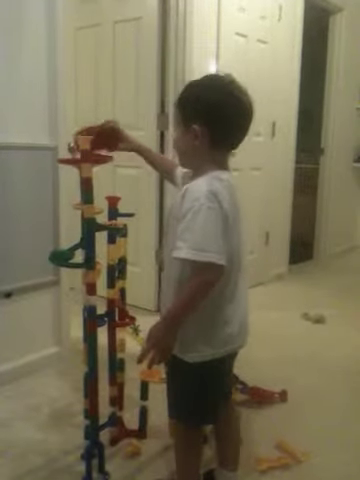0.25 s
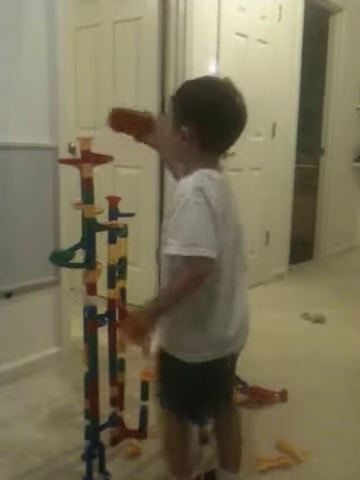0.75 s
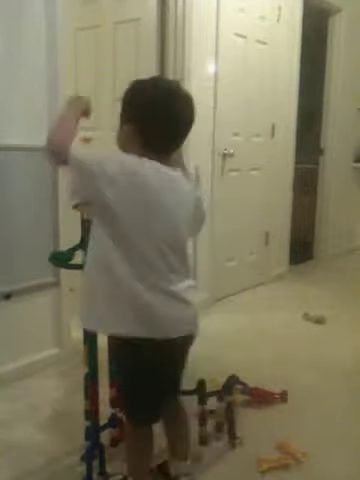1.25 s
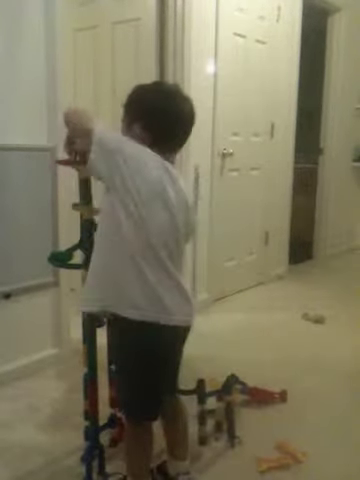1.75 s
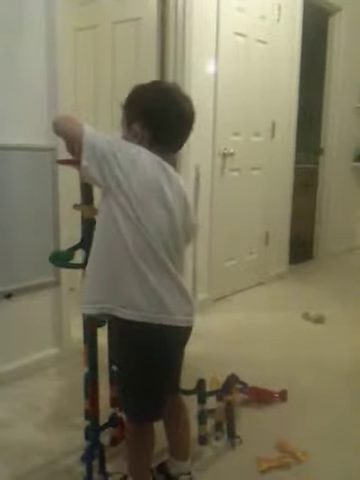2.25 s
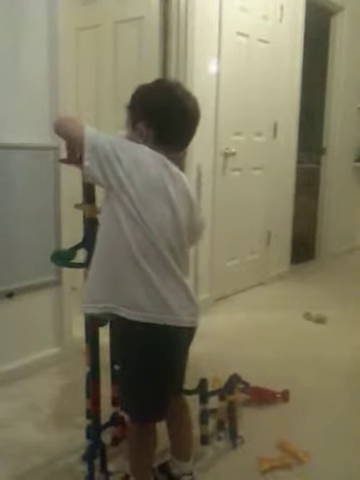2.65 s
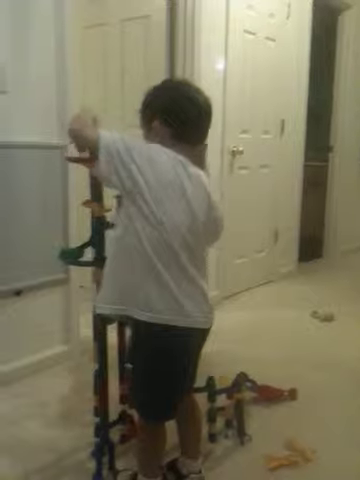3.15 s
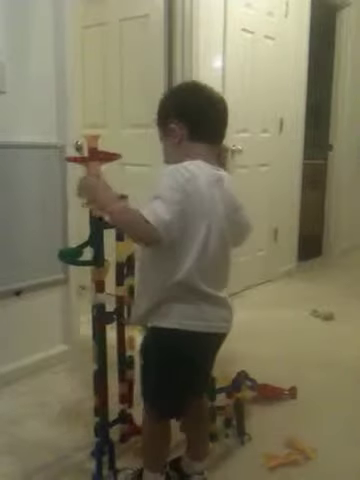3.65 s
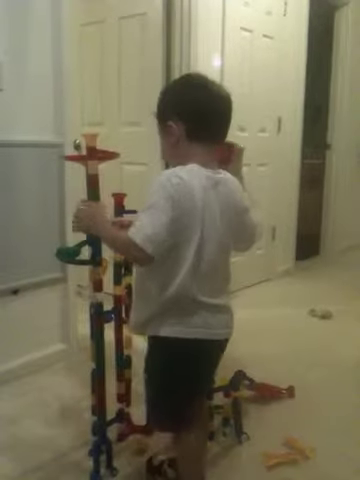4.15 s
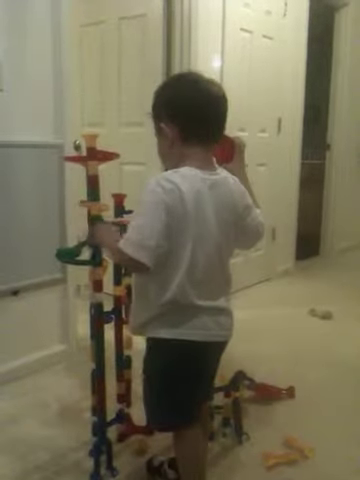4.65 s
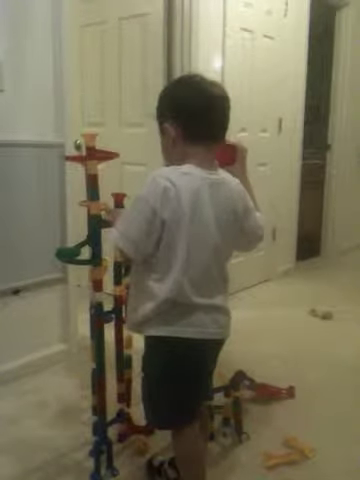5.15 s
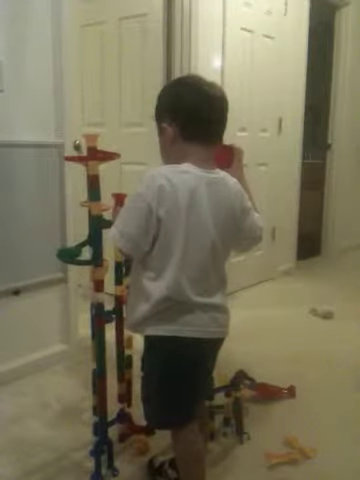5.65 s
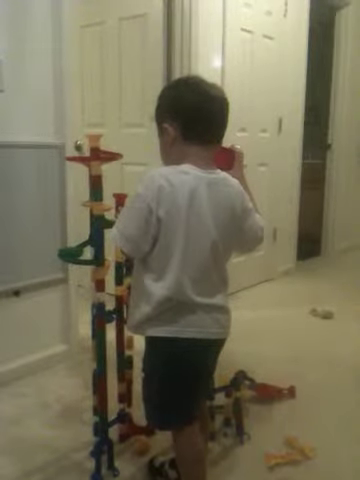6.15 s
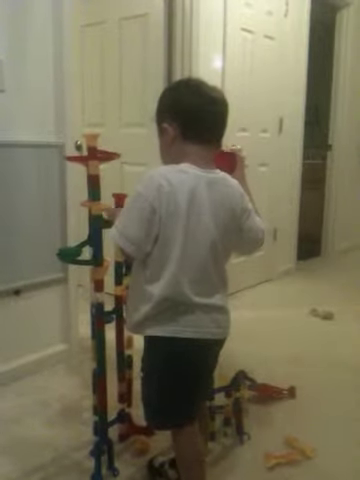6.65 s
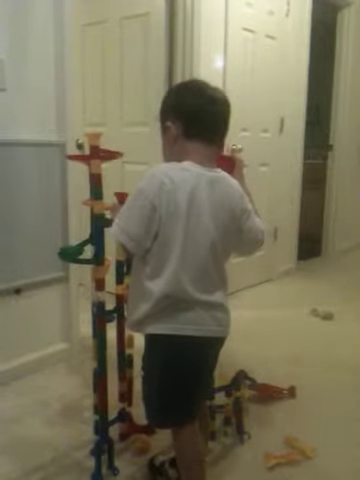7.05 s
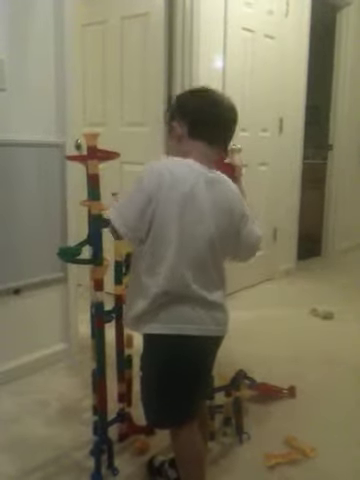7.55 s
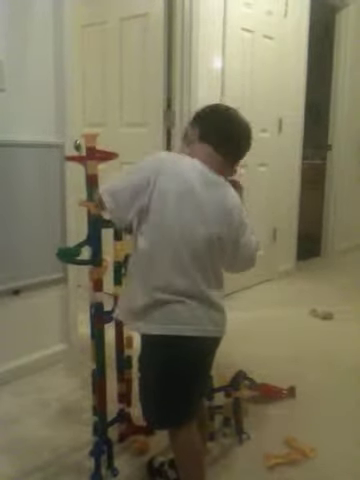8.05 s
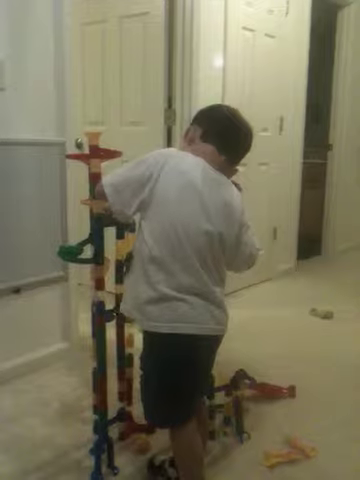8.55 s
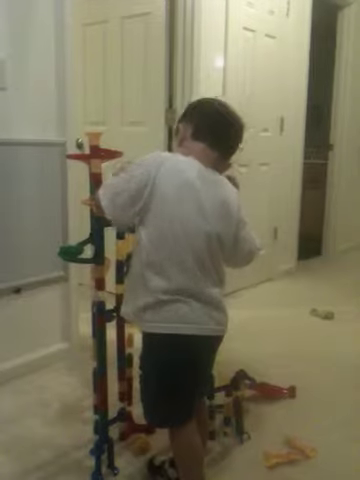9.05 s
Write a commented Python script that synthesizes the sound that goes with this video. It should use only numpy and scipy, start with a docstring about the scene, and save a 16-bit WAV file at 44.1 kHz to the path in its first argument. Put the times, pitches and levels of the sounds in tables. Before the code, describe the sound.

Glass marbles pour through a tall plastic marble run in a bare hallway. Rapid irregular knocks, each a tiny burst of bouncing clicks, overlap with rolling patter and a hollow funnel rattle. It is busiest in the first several seconds, then becomes lighter and sparser towards the end. One fairly close microphone catches short lively reflections over faint house hum and hiss.

```python
"""In a bare hallway, glass marbles are tipped into a tall plastic marble run and clatter down it.
Each knock is a train of quick clicks that rings the track pieces, the hollow funnel and the struck piece.
Rolling marbles are a patter of random small clicks between the knocks, with a humming trough below.
Noise-built hallway responses smear it into a dense rattle; the funnel's neck and the house sound beneath."""
import sys
import numpy as np
from scipy import signal
from scipy.fft import rfft, irfft, next_fast_len
from scipy.io import wavfile

SR = 44100
rng = np.random.default_rng(int(sys.argv[2]) if len(sys.argv) > 2 else 0)


def digitize_waveform(pressure):
    """Quantize a signal to 16-bit integers and store it at the path in sys.argv[1].

    Rows of a 2-D input are taken as channels; values are limited to [-1, 1].
    """
    field = np.atleast_2d(pressure).T
    bounded = np.clip(field, -1, 1)
    quanta = np.round(bounded * 32767).astype(np.int16)
    wavfile.write(sys.argv[1], SR, quanta)


N = 410130  # samples

# knocks of marbles on the run, all levels relative: start_s, peak_db, glassy tick_db, thin edge_db and
# funnel_db re peak, struck piece_hz, its ring piece_db re peak
KNOCKS = [(0.0024, -17.5, -28, -1, -14, 2800, -42), (0.0326, -16.5, -27, 1.5, -21, 1860, -21),
          (0.0799, -13.5, -17, 3.5, -22, 3650, -33), (0.127, -14, -18, 2.5, -15, 2150, -24),
          (0.183, -12.5, -28, -0.5, -16, 2450, -25), (0.2847, -17, -16, 4.5, -14, 1820, -18),
          (0.3044, -18, -24, -1, -15, 1970, -38), (0.374, -39, -6, 6.5, -21, 3590, -19),
          (0.4412, -20, -22, 5.5, -25, 3620, -41), (0.5368, -17, -26, -4, -37, 2170, -29),
          (0.5597, -14.5, -17, -0.5, -16, 2800, -26), (0.5891, -15, -28, 0, -18, 3330, -20),
          (0.6896, -13, -16.5, 3, -31, 2590, -41), (0.7337, -18, -16, 0.5, -15, 2310, -34),
          (0.8321, -13.5, -19, 0.5, -14, 4830, -15), (0.853, -24, -20, -1, -32, 2450, -30),
          (0.913, -15, -16, -1.5, -16, 1940, -34), (0.97, -17, -13, 1.5, -13, 2760, -40),
          (1.0043, -22.5, -8, -9, -12, 2495, -36), (1.0634, -16.5, -21, -3, -21, 1940, -22),
          (1.1047, -21.5, -7.5, -19, -8, 2790, -42), (1.152, -15.5, -19, -2.5, -21, 1990, -27),
          (1.22, -19, -19, -4, -17, 2710, -40), (1.277, -18, -16, 1.5, -19, 1970, -38),
          (1.299, -14.5, -14.5, 0, -15, 1920, -36), (1.388, -13, -17.5, -4, -17.5, 1900, -43),
          (1.4776, -14, -16.5, -0.5, -18.5, 2830, -38), (1.5416, -19.5, -12, 3.5, -12, 2800, -40),
          (1.5846, -17, -11.5, 6.5, -13.5, 4340, -24), (1.6995, -20.5, -13, 1, -17, 2940, -31),
          (1.7321, -19.5, -13, 6.5, -24, 4720, -35), (1.828, -24.5, -6, 8, -31, 4870, -23),
          (1.879, -21.5, -29, 3, -39, 2320, -30), (1.9558, -25.5, -1.5, 2, 0, 1970, -33),
          (2.019, -37, -15, 5, -18, 2380, -32), (2.151, -23, -7, 6, -12, 2500, -38),
          (2.1597, -17.5, -19, 0, -9, 2620, -38), (2.1712, -7, -17, 0.5, -16, 2230, -41),
          (2.2175, -16, -17, 3, -18, 3750, -40), (2.25, -15.5, -17, 5, -21, 2530, -19),
          (2.2845, -28, -4, -10, -2, 2580, -32), (2.41, -17, -12, 4, -17, 2970, -18),
          (2.459, -14, -20, 2.5, -14, 2060, -33), (2.5375, -20.5, -10, 7, -7, 3560, -32),
          (2.5774, -12.5, -19, 1, -16, 2910, -37), (2.6187, -16, -17, 2, -26, 4500, -29),
          (2.6999, -10, -14.5, -2, -17, 4880, -21), (2.77, -16.5, -10.5, 4.5, -9.5, 2360, -30),
          (2.824, -14.5, -24, -2, -24, 2930, -35), (2.8481, -17.5, -13, 4, -11, 2790, -33),
          (2.9091, -17.0, -23, 1, -7, 3360, -37), (3.0002, -19.5, -15, 4, -6, 2810, -39),
          (3.0751, -13.5, -15, 3, -17, 2700, -30), (3.1, -15, -30, -5, -16, 2970, -25),
          (3.1826, -20, -21, 3, -7, 2020, -35), (3.2394, -18, -10, 5, -27, 2550, -43),
          (3.3686, -15, -13, 4.5, -20, 2150, -16), (3.38, -20, -19, 3.5, -16, 5000, -23),
          (3.444, -29.5, -4, 4.5, -18, 2870, -1.5), (3.5115, -18, -9, 5.5, -7.5, 4100, -20),
          (3.607, -27, -23, 1, -2.5, 2950, -22), (3.678, -15, -14, 2, -22, 3800, -36),
          (3.7455, -10, -19, 0.5, -12.5, 3660, -43), (3.823, -14.5, -26, -1, -16, 2010, -35),
          (3.848, -13.5, -24, 1, -13, 3600, -39), (3.8937, -20, -10, 5, -8, 4760, -32),
          (3.9613, -18.5, -11, -1, -10, 2580, -22), (3.9902, -19, -16.5, 5, -15, 5070, -19),
          (4.0205, -16.5, -12, 5, -8, 2600, -36), (4.093, -20.5, -6, 2, -11, 2860, -37),
          (4.1539, -17.5, -11, 6.5, -14, 2170, -34), (4.1787, -16, -16, 5, -9, 2200, -32),
          (4.255, -12, -13, 1, -11, 2020, -39), (4.299, -18, -26, 2.5, -18, 3270, -27),
          (4.352, -27, -17, 4.5, -18, 2640, -37), (4.392, -32, -13, 6, -25, 3640, -29),
          (4.449, -25.5, -8, 2, -18, 2810, -31), (4.507, -14.5, -13, 3.5, -29, 2530, -38),
          (4.5718, -18, -15, 1.5, -23, 2520, -19), (4.6329, -10.5, -13.5, 1, -17.5, 2590, -34),
          (4.689, -30, -11, 1.5, -12, 2590, -26), (4.7718, -21.5, -3.5, 7, -2.5, 2730, -32),
          (4.809, -24, -23, -4, -20, 2150, -23), (4.8801, -20.5, -21, 2.5, -9, 2590, -31),
          (4.9372, -17.5, -21, 4, -12, 4210, -37), (4.993, -20, -15, 1.5, -14, 2800, -29),
          (5.0497, -15, -18, 1, -31, 2590, -18), (5.08, -17, -15, 4, -10, 2600, -24),
          (5.129, -17.5, -13, 2.5, -13, 2590, -33), (5.1906, -16.5, -26, -5, -19, 2600, -21),
          (5.244, -17, -20, -2, -14, 2580, -26), (5.275, -20, -22, -3, -12, 2600, -34),
          (5.3132, -18.5, -13, 2.5, -14, 2550, -31), (5.3547, -14, -16, -0.5, -13, 2480, -24),
          (5.452, -24.5, -12, 7, -17, 2250, -37), (5.5002, -18, -11.5, 5, -6, 5100, -21),
          (5.6397, -21, -11.5, -2, -16, 2330, -38), (5.668, -17.5, -22, 1.5, -18, 2230, -25),
          (5.7559, -17, -18, 2.5, -15, 2220, -23), (5.8376, -14.5, -21, 0.5, -15.5, 3600, -45),
          (5.909, -9, -20, -3.5, -22, 3600, -38), (5.9545, -15, -19, 1.5, -16, 2900, -22),
          (6.0084, -21, -31, -3, -33, 2120, -35), (6.0688, -19, -17, 3, -19, 2140, -22),
          (6.1439, -22, -26, 1, -19, 3030, -25), (6.1852, -20.5, -12.5, 0.5, -16, 3760, -37),
          (6.2901, -21, -30, 0, -16, 2340, -27), (6.31, -24, -30, 0, -9, 2390, -28),
          (6.369, -12, -15, -3, -17, 2580, -30), (6.3794, -17, -26, 0.5, -13.5, 2800, -34),
          (6.422, -14, -16, -2, -13, 2300, -27), (6.44, -21, -19, -10, -12, 2360, -32),
          (6.469, -19, -26, 4, -27, 2620, -22), (6.5176, -14, -30, -1.5, -16, 3320, -24),
          (6.5967, -18.5, -17, 1, -20, 4590, -35), (6.6297, -20.5, -26, 2.5, -27, 2880, -16),
          (6.7224, -17.5, -14, 2.5, -21, 2330, -22), (6.7385, -19, -12, 2, -14, 2330, -28),
          (6.7851, -16.5, -13, 0, -18, 2350, -27), (6.9384, -17, -18, -3.5, -15, 2300, -29),
          (7.0267, -17.5, -9, 3.5, -11, 2440, -32), (7.0915, -19, -21, 3.5, -28, 2360, -36),
          (7.222, -17, -19, 1.5, -12, 3240, -27), (7.2576, -20, -10, 2, -9, 2140, -21),
          (7.4459, -20, -14, -7, -16, 2460, -25), (7.4561, -23, -16, 1.5, -13, 2370, -29),
          (7.5181, -23, -16, 3.5, -16, 2420, -31), (7.592, -30.5, -20, -1, -20, 2790, -34),
          (7.7306, -18, -12, -2, -15, 5200, -21), (7.7742, -22, -10, -2, -11, 2540, -22),
          (7.7878, -23, -7, 5.5, -10, 2480, -33), (7.8714, -18, -16, 3, -23, 2670, -23),
          (7.902, -20.5, -16, 1, -22, 2490, -36), (7.957, -21.5, -17, 2.5, -25, 3200, -29),
          (8.0641, -27, -3.5, 6.5, -10, 3900, -26), (8.124, -21, -18, 5, -27, 3700, -21),
          (8.2, -25, -8.5, 5, -20, 2540, -40), (8.2834, -23.5, -18, 3.5, -20, 2290, -16),
          (8.355, -25, -22, 6, -26, 2340, -13), (8.3748, -21, -9, 2, -9.5, 2420, -18.5),
          (8.4852, -20, -11, 4, -27, 3800, -20), (8.5288, -21.5, -14, 4, -34, 2530, -25),
          (8.592, -23, -10, 8, -32, 4840, -33), (8.6544, -24.5, -7, 6, -29, 2250, -18),
          (8.7022, -25.5, -22, 2.5, -31, 2360, -29), (8.769, -23, -23, 0, -25, 3740, -36),
          (9.003, -20.5, -12, 0.5, -17, 2300, -29.5), (9.024, -22, -9, 9, -12, 2240, -36),
          (9.0702, -29, -9, 6, -5, 2800, -32), (9.109, -34, -9, 3.5, 0, 2200, -28),
          (9.2086, -16.5, -11, -1, -20, 3600, -21), (9.218, -26, -1, -16, -39, 2370, -28),
          (9.2302, -19.5, -24, 3, -17, 2310, -14.5), (9.2786, -23, -28, 0, -29, 2230, -17)]
# the funnel rings while marbles circle in it and falls quiet as it empties: time_s, relative ring_db
FUNNEL_LOAD = [(0, -17.5), (.8, -16.5), (1.5, -14.5), (2.6, -16.5), (4, -17), (5.35, -16.5), (5.7, -20.5),
               (6.5, -19.5), (7.5, -20), (8.3, -20.5), (9.3, -24.5)]


def from_db(db):
    """Turn decibels into gain."""
    return 10 ** (np.asarray(db) / 20)


def rms_one(x):
    """Scale to rms 1."""
    return x / np.sqrt(np.mean(x ** 2) + 1e-20)


def along(rows, s):
    """Read a curve in time."""
    return np.interp(s, *np.transpose(rows))


def at_hz(points, hz):
    """Read a table on a log-frequency axis."""
    points = np.array(points)
    return np.interp(np.log(hz), np.log(points[:, 0]), points[:, 1])


def steep(x, hz, kind, order=4):
    """Low- or high-pass with a Butterworth slope."""
    return signal.sosfilt(signal.butter(order, hz, kind, fs=SR, output="sos"), x)


def bands(pair):
    """Yield third-octave centres and bands; neighbours come from unrelated inputs."""
    edges = 50 * 2 ** (np.arange(27) / 3)
    for k, (low, high) in enumerate(zip(edges, edges[1:])):
        band_filter = signal.butter(2, [low, high], "band", fs=SR, output="sos")
        yield np.sqrt(low * high), signal.sosfilt(band_filter, pair[k % 2])


def ring(clicks, modes, spread_db, per_s):
    """Ring two-pole modes; how well each is struck wanders as the marbles move from piece to piece."""
    out = 0
    steps = np.arange(N) * per_s / SR
    for hz, width_hz, level_db in modes:
        wander = np.interp(steps, np.arange(400), np.clip(rng.standard_normal(400), -3, 1.3))
        struck = clicks * from_db(level_db + spread_db * wander) + 1e-18
        r = np.exp(-np.pi * width_hz / SR)  # pole radius: a narrow mode rings longer
        feedback = [1, -2 * r * np.cos(2 * np.pi * hz / SR), r * r]
        out = out + signal.lfilter([(1 - r * r) / 2, 0, (r * r - 1) / 2], feedback, struck)
    return out


def house():
    """The quiet hum and hiss of the house: steady noise, coloured band by band."""
    # spectrum of the hum and hiss: centre_hz, relative level_db per Hz
    colour = [(60, -2), (140, -2.5), (280, -0.5), (650, -7.5), (1250, -8), (2250, 2.5), (3300, -34),
              (7000, -6), (14000, -55)]
    noise = rng.standard_normal((2, N))
    hiss = sum(from_db(at_hz(colour, hz)) * band for hz, band in bands(noise))
    return from_db(-58.5) * rms_one(hiss)


def hallway(trains, direct_db, near_db, near_t60):
    """A brief direct crack; close walls answer at once and die fast, the far end lingers."""
    # colour of a bare knock: centre_hz, relative level_db per Hz
    clatter = [(80, -37), (125, -23), (220, -34), (400, -18), (600, -16), (950, -18), (1300, -17),
               (1600, -7), (2500, -3), (3200, -5.5), (4200, -4), (7300, -6), (9300, -14), (12000, -10),
               (15000, -17)]
    # decay at the far end: centre_hz, t60_s
    far_end = [(150, 0.6), (600, 0.78), (2300, 0.76), (3600, 0.73), (6000, 0.69), (14000, 0.49)]
    paths = 9  # heights on the tower, each with its own way through the hallway
    t = np.arange(int(.45 * SR)) / SR
    responses = 0
    for hz, diffuse in bands(rng.standard_normal((2, paths, len(t)))):
        direct = from_db(direct_db - 60 * t / 0.0026)
        near = from_db(near_db - 60 * t / near_t60)
        far = from_db(-60 * t / at_hz(far_end, hz))
        responses = responses + from_db(at_hz(clatter, hz)) * diffuse * (direct + near + far)
    # the clicks hop to a random height every 300 samples
    height = np.repeat(rng.integers(0, paths, N // 300 + 1), 300)[:N]
    size = next_fast_len(N + len(t))
    heard = sum(rfft(trains * (height == k), size) * rfft(path, size) for k, path in enumerate(responses))
    return irfft(heard, size)[:, :N] / np.sqrt(np.sum(responses ** 2) / paths)


def neck(per_s):
    """Queued marbles jostle in the funnel's neck and keep its narrow tube note sounding."""
    # the note swells and sinks with the queue: time_s, level_db
    queue = [(0, -36.5), (.35, -41), (.6, -54), (1.9, -50.5), (2.0, -44), (2.14, -58), (2.18, -38),
             (2.3, -39), (2.41, -54), (2.5, -33), (2.7, -43), (3.0, -44), (3.2, -50), (3.29, -42),
             (3.44, -42), (3.62, -39.5), (3.72, -47), (3.8, -38.5), (4.0, -56), (4.3, -46.5), (4.5, -51),
             (4.65, -44), (4.8, -43), (5.0, -42), (5.3, -48), (5.6, -53), (8.7, -59), (9.3, -82)]
    neck_hz, neck_width_hz = 1442, 16
    jostle = rng.standard_normal(N) * (rng.random(N) < per_s / SR)
    note = ring(jostle, [(neck_hz, neck_width_hz, 0)], spread_db=-4.5, per_s=11)
    note = steep(steep(note, 1040, "high", order=2), 1400, "low", order=2)
    return from_db(along(queue, np.arange(N) / SR)) * rms_one(note)


def tower(track, funnel, tick, edge, pieces):
    """Funnel below, track and edges in the middle, glass on top; funnel and track add modes to a dry crack."""
    # modes of the hollow funnel: centre_hz, width_hz, relative level_db
    funnel_modes = [(239, 79, 1.5), (393.3, 19, -2), (433, 42, -6), (702.3, 27.4, 1.5), (892, 21, -1),
                    (1087, 19, -4), (1210, 27, -1.5), (1330, 35, -6)]
    # modes of the thin track pieces: centre_hz, width_hz, relative level_db
    track_modes = [(1220, 100, 7), (1680, 44, -12), (1850, 97, -11), (1976, 56, 7), (2155, 26, 11),
                   (2420, 74, 9), (2592, 28, 10), (2793, 31, 2.5), (2800, 33, -28), (2920, 61, -22),
                   (4760, 67, -7)]
    edge_hz = 3440  # above this the thin edges of the track click
    body_below_hz, body_follows = 3800, 0.17  # track's low part fades with this share of the funnel's fall
    funnel_follows = 1.58  # the funnel's upper ring fades with this multiple of its fall

    load_db = along(FUNNEL_LOAD, np.arange(N) / SR)
    fall_db = load_db - load_db.max()
    body, full = from_db(body_follows * fall_db), from_db(funnel_follows * fall_db)

    struck = steep(track, edge_hz, "low") + steep(edge, edge_hz, "high")
    thin = steep(steep(struck, 750, "high", order=3), 6400, "low")  # small pieces radiate little bass
    rung = thin + from_db(-7.5) * ring(struck, track_modes, spread_db=5.0, per_s=13)
    rung = body * rung + (1 - body) * steep(rung, body_below_hz, "high")

    hollow = steep(steep(funnel, 181, "high"), 1700, "low", order=2)
    hollow = hollow + from_db(7.5) * ring(funnel, funnel_modes, spread_db=-0.5, per_s=3.4)
    hollow = full * hollow + (1 - full) * steep(hollow, 435, "low", order=3)  # an empty funnel only thuds
    return hollow + rung + steep(tick, 6010, "high") + pieces


def rolling(per_s, uneven_db):
    """Many small contacts of marbles on seams and each other; the liveliest of three knocks sets the patter."""
    # patter of the rolling marbles: time_s, relative level_db
    patter = [(0, -29), (.6, -31), (.95, -35.5), (1.3, -39), (1.65, -41.5), (1.85, -35), (2.05, -34.5),
              (2.3, -37), (2.65, -31.5), (3.0, -30.5), (3.8, -29.5), (4.05, -38), (4.35, -29.5),
              (5.15, -33), (5.4, -39), (5.75, -39), (6.0, -39), (6.3, -38.5), (6.6, -35.5), (7.1, -32),
              (7.6, -33), (8.2, -35.5), (8.72, -36.5), (8.82, -59), (8.97, -75), (9.03, -38), (9.3, -37.5)]
    # the trough that most marbles roll in hums under them: time_s, pitch_hz, ring_db re patter
    trough = [(0, 2400, -48), (1, 2710, -41), (2.2, 2590, -46), (2.5, 2750, -41.5), (3.5, 2800, -43.5),
              (4.2, 2600, -40), (5.4, 2560, -52), (5.7, 2340, -39.5), (6.2, 2240, -38.5),
              (6.5, 2350, -43.5), (7.4, 2300, -50), (7.9, 2350, -44), (8.5, 2240, -43.5), (8.75, 2330, -36),
              (9.3, 2330, -37)]
    trough_width_hz = 660
    trough_spread = 0.032  # each knock sends marbles into a trough of slightly different pitch
    # a marble rolls on after its knock, then comes to rest; it takes a share of the knock's strength
    roll_on_s, roll_fade_db_per_s, roll_follows = 0.058, 129, 0.36
    funnel_extra_db, tick_db = 9.5, -9  # patter's funnel share over its load curve; glassy tick re patter

    t = np.arange(N) / SR
    start_s, peak_db, _, edge_db = np.array(KNOCKS).T[:4]
    last = np.maximum(np.searchsorted(start_s, t) - np.arange(1, 4)[:, None], 0)  # last three knocks
    strength_db = roll_follows * (peak_db - peak_db.mean())[last]
    rest_db = roll_fade_db_per_s * np.maximum(t - start_s[last] - roll_on_s, 0)
    lively_db = (strength_db - rest_db).max(axis=0)

    sizes = from_db(uneven_db * np.minimum(rng.exponential(1, N), 4)) * rng.choice([-1, 1], N)
    clicks = rms_one(sizes * (rng.random(N) < per_s / SR)) * from_db(along(patter, t) + lively_db)

    # a resonance with a moving centre: turn the clicks down to 0 Hz, ring them there, turn back up
    trough_s, trough_hz, trough_db = np.transpose(trough)
    detune = 1 + trough_spread * rng.standard_normal(len(start_s))[last[0]]
    pitch_hz = np.interp(t, trough_s, trough_hz) * detune
    turn = np.exp(2j * np.pi * np.cumsum(pitch_hz) / SR)
    r = np.exp(-np.pi * trough_width_hz / SR)
    hum = np.imag(turn * signal.lfilter([1], [1, -2 * r, r * r], clicks / turn))
    hum = from_db(np.interp(t, trough_s, trough_db)) * hum

    # shares of track, funnel, tick and edges
    shares_db = [0 * t, along(FUNNEL_LOAD, t) + funnel_extra_db, 0 * t + tick_db, edge_db[last[0]]]
    return np.vstack([clicks * from_db(shares_db), hum])


def knocks(count, fade_db, scatter_db, piece_cycles):
    """Glass ticks, then plastic rattles up and dies: trains for track, funnel, tick, edges, and piece rings."""
    bounce_ms, bounce_spread_ms = 26, 4.0  # time that the bounces after a knock take
    build_share, build_depth_db = 0.39, 1  # rattles fully this far into the bounces; how much softer it starts

    start_s, peak_db, tick_db, edge_db, funnel_db, piece_hz, piece_db = np.array(KNOCKS).T[:, :, None]
    chance = rng.random((len(KNOCKS), 3, count))
    lasts_ms = bounce_ms + bounce_spread_ms * rng.uniform(-1.5, 1.5, (len(KNOCKS), 1))
    order = np.arange(count)
    late = (order + chance[:, 0] * (order > 0)) / count  # share of the bounce time
    sizes = from_db(peak_db - fade_db * late + scatter_db * (chance[:, 1] - 1.0))
    sizes = sizes * np.sign(chance[:, 2] - .5)
    build_db = -build_depth_db * np.maximum(1 - late / build_share, 0)
    at = np.minimum(((start_s + late * np.abs(lasts_ms) / 1000) * SR).astype(int), N - 1)

    t = np.arange(4096)  # samples of piece ring
    trains = np.zeros((5, N + len(t)))
    shares_db = (build_db, funnel_db + build_db, tick_db, edge_db + build_db / 2)
    for train, share_db in zip(trains, shares_db):
        np.add.at(train, at, sizes * from_db(share_db))

    # the struck piece loses 60 dB in piece_cycles cycles of its own pitch
    decay_db = 60 * t / SR * piece_hz / piece_cycles
    rings = np.sin(2 * np.pi * piece_hz * t / SR) * from_db(piece_db - decay_db)
    struck = sizes * from_db(build_db)
    np.add.at(trains[4], at[:, :, None] + t, struck[:, :, None] * rings[:, None])
    return trains[:, :N]


def scene():
    """Knocks and rolling marbles shake the same tower in the same hallway."""
    # gain rows: track, funnel, glass, edges, and struck piece (knocks) or trough hum (rolling)
    trains = knocks(count=14, fade_db=16.0, scatter_db=6.5, piece_cycles=37.0)
    trains *= from_db([[12], [30.5], [22.5], [12.5], [11]])
    trains += from_db([[-4], [9.5], [3], [-3.5], [-3]]) * rolling(per_s=500, uneven_db=3.5)
    heard = hallway(trains, direct_db=17, near_db=12, near_t60=.085)
    return np.tile(tower(*heard) + neck(per_s=900) + house(), (2, 1))


def record(dry):
    """One microphone on both channels: bass rolled off, top cut."""
    cutoff_hz = 15900
    thin = steep(dry, 144, "high")
    return signal.sosfilt(signal.cheby2(14, 60, cutoff_hz, fs=SR, output="sos"), thin)


dry = scene()
out = record(dry)
digitize_waveform(out)
```